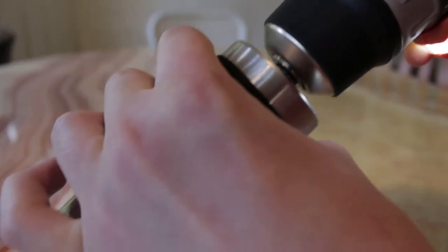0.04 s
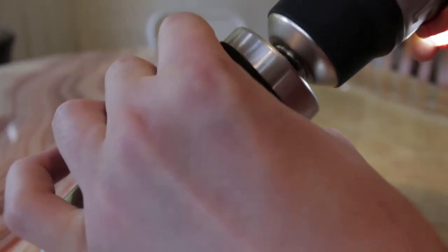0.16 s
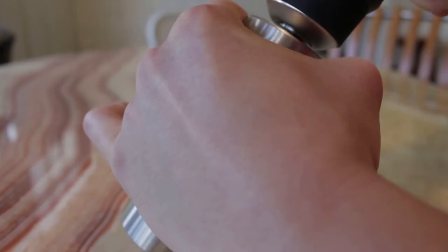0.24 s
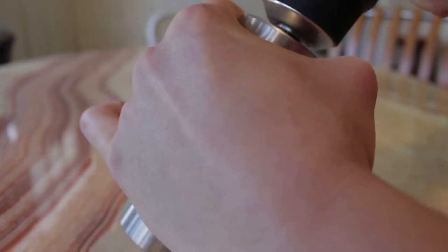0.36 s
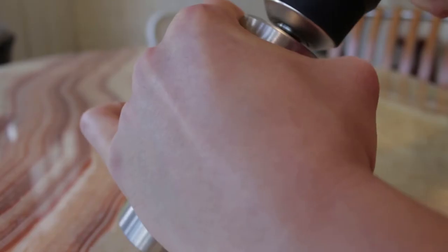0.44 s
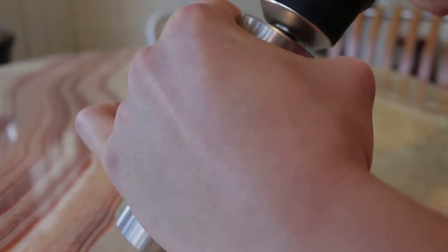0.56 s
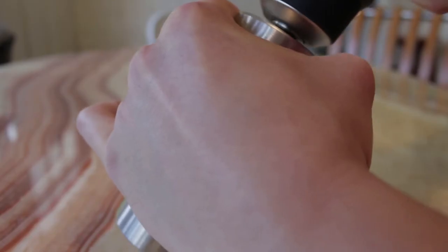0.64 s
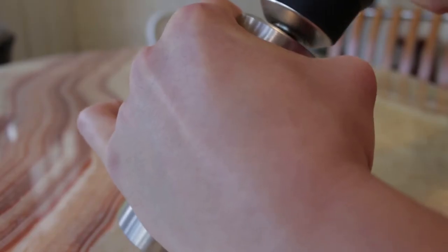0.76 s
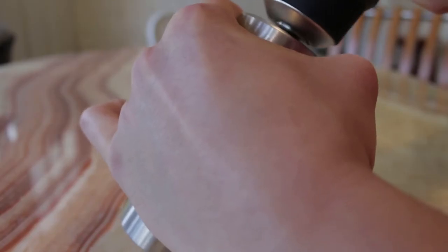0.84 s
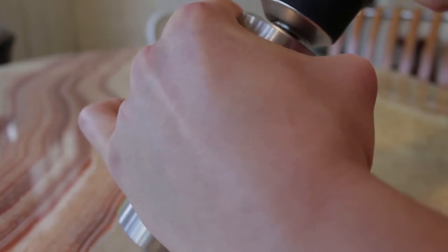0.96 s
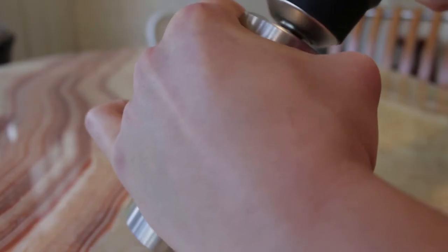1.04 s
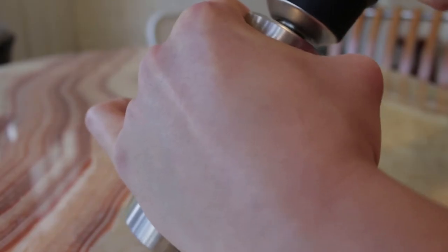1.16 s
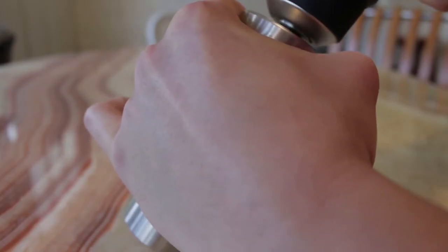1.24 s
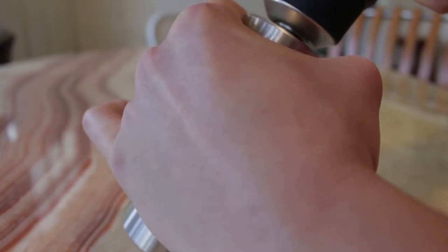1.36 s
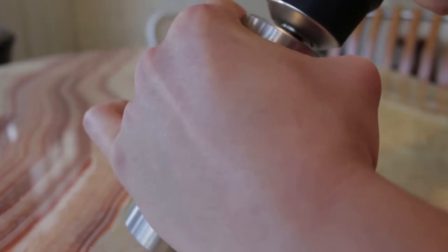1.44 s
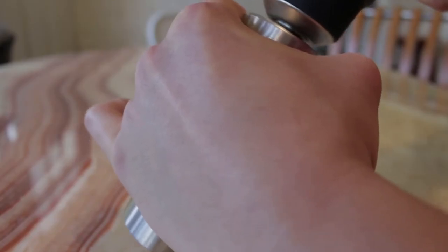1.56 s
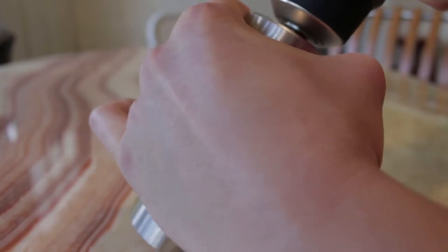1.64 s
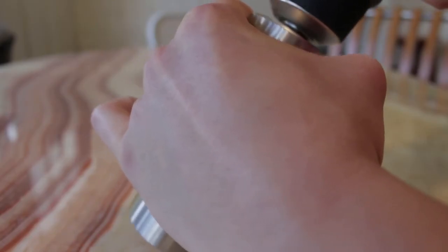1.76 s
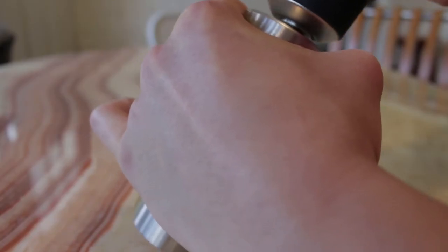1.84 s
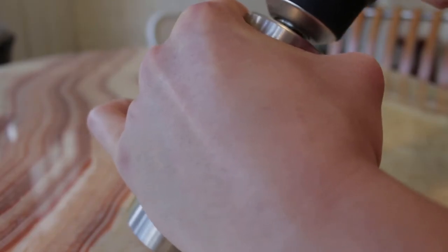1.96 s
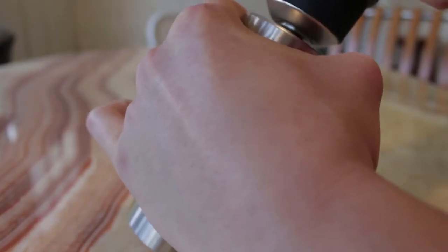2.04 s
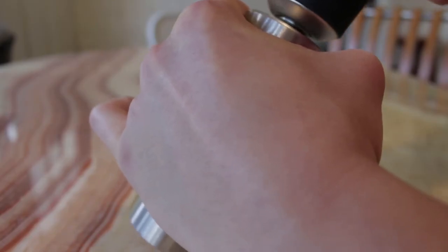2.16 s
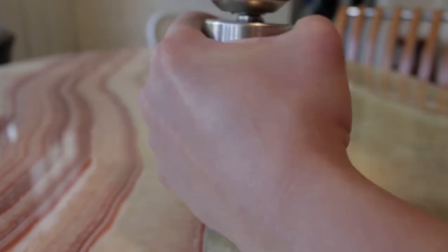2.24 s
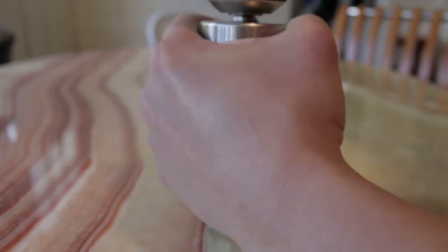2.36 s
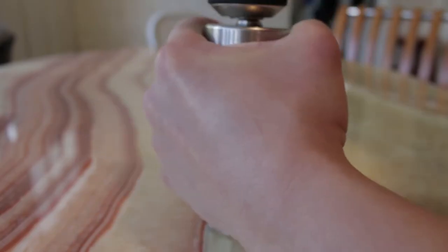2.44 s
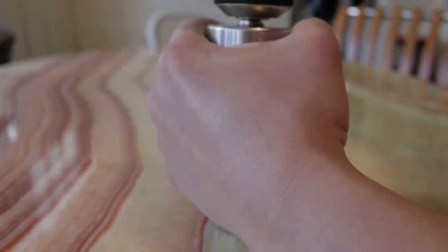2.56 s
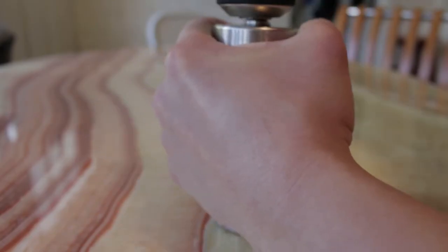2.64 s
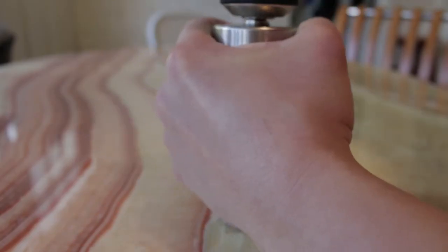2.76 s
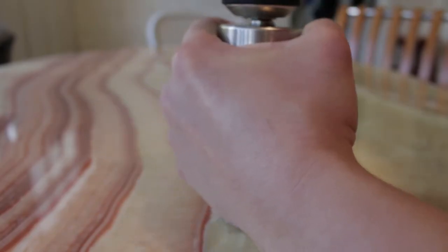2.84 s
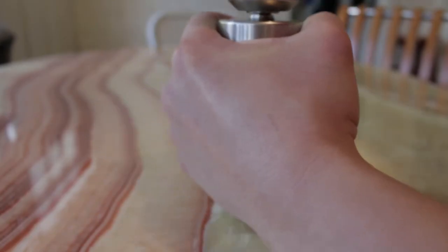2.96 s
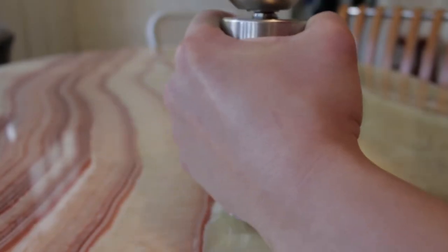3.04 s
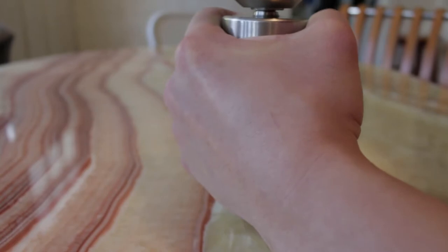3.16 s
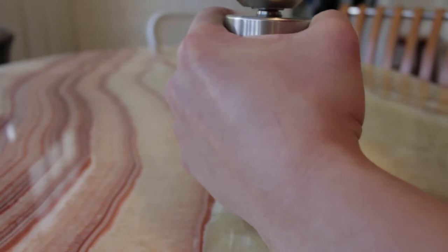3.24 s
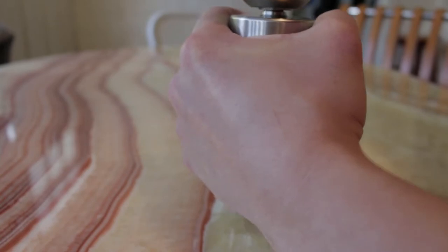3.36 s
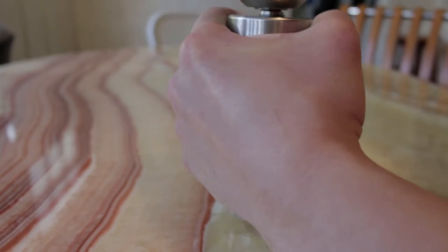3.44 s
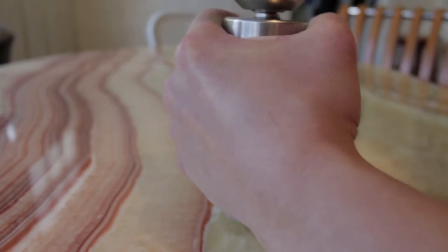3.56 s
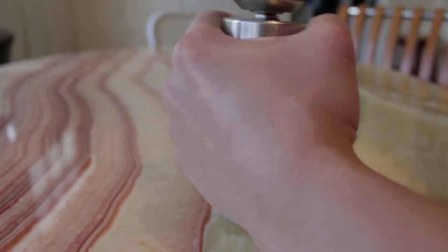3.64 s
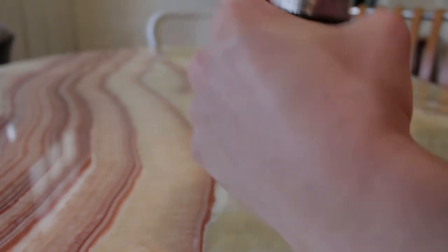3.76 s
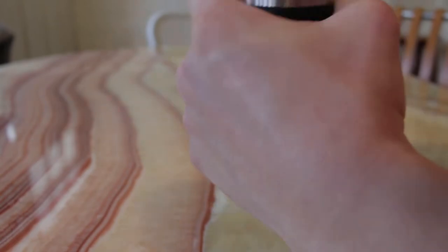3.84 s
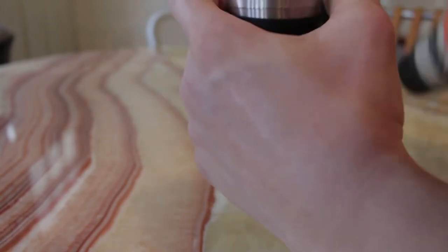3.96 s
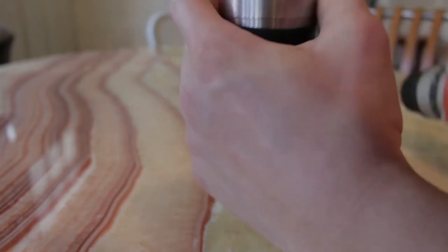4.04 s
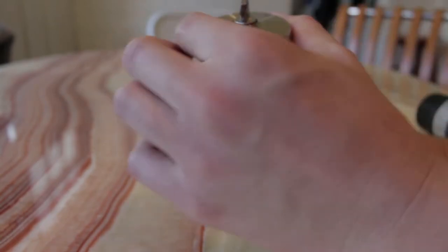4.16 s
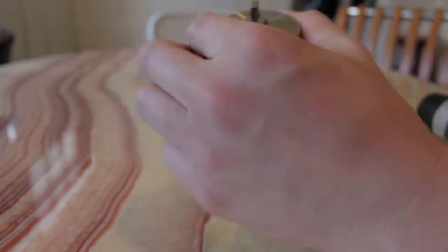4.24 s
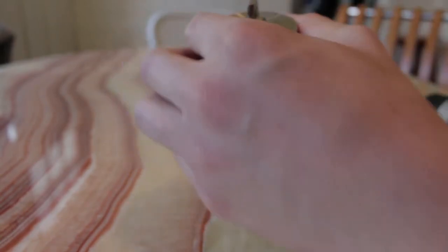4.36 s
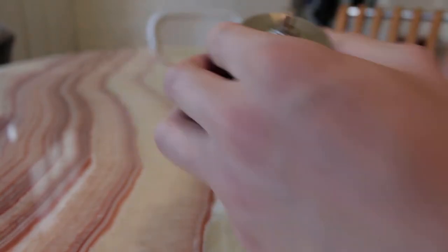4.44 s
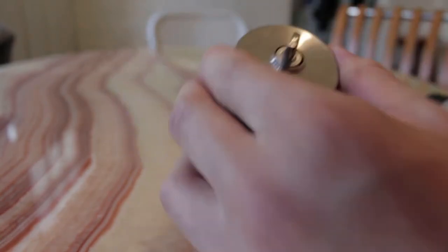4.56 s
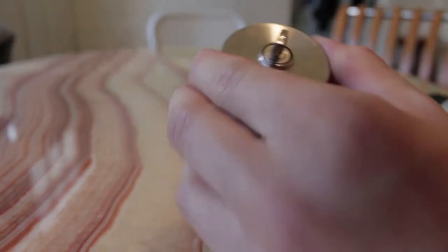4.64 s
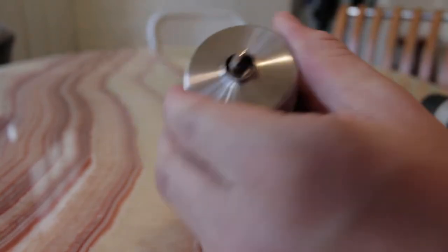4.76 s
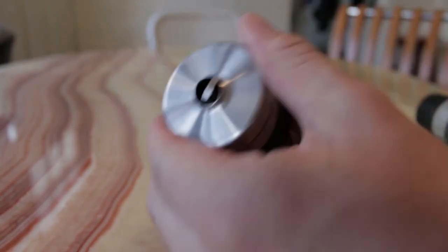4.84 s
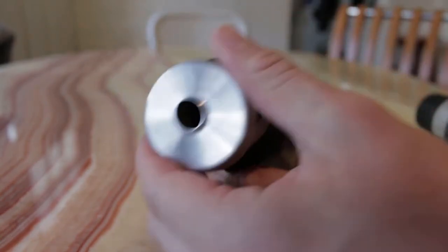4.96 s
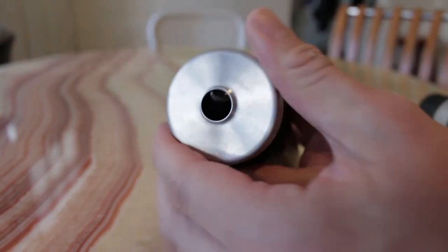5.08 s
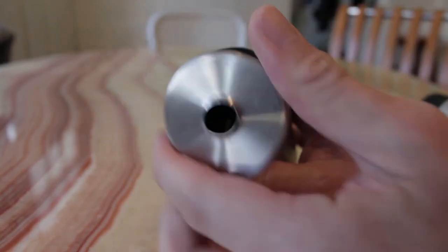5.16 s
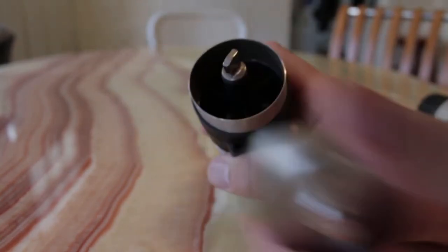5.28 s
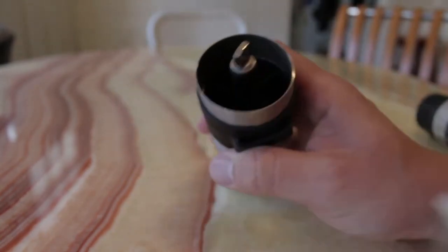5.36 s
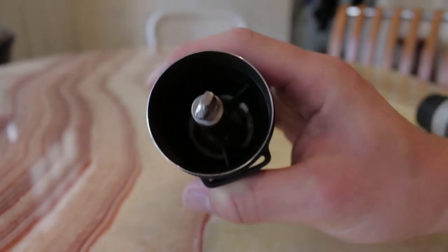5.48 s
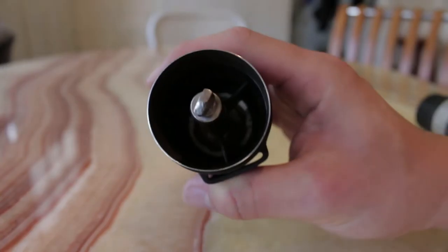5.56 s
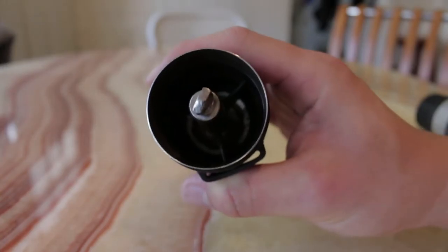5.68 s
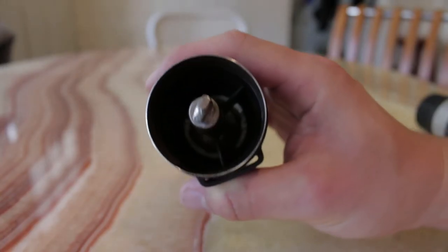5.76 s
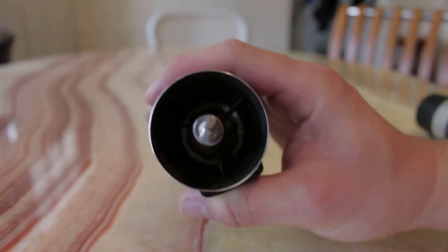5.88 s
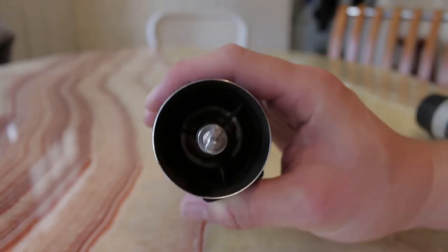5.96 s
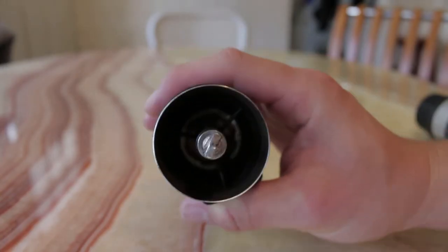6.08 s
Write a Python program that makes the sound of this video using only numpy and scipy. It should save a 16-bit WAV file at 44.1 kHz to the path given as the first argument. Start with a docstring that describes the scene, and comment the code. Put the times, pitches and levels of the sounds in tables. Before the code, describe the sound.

A cordless drill is already running at the start, humming and whining as it spins a steel hand coffee grinder. At about 0.2 seconds the burrs bite: beans crunch densely, with small squeals and chirps, and the gears warble under the uneven load. The grinding stays loud and steady, shifting slightly in tone at 2.2 seconds. From 2.4 to 2.9 seconds the grinder chatters softly on the table. The drill stops abruptly at 3.7 seconds. A lens motor whirrs faintly beside the microphone from about 4.1 to 5.4 seconds. The drill is put down with a knock at 4.4 seconds and a lighter plastic clatter at 4.6. Around 4.8 seconds the steel lid clinks and scrapes off over the hollow cup. A soft hand bump and rub follow at 5.2, leaving low room tone until 6 seconds. Everything is close, in stereo, in a small quiet room.

```python
"""A cordless drill spins a steel hand coffee grinder held over a table. The motor hums and whines, the
gears warble under the uneven load, beans crunch and squeal between the burrs, and the grinder briefly
chatters on the table top. The drill stops and is put down with a knock. A lens motor whirrs faintly by
the microphone, the steel lid clinks and scrapes off over the hollow cup, and the hand shifts its grip.
All of it is close, in stereo, in a small quiet room."""
import sys
import numpy as np
from scipy import signal
from scipy.fft import rfft, irfft
from scipy.io import wavfile

SR = 44100
rng = np.random.default_rng(int(sys.argv[2]) if len(sys.argv) > 2 else 0)


def unload_audio(sound):
    """Save the sound as a 16-bit wav file, at the path given as the first command line argument."""
    columns = np.transpose(np.atleast_2d(sound))
    # keep every value between -1 and 1, then stretch to whole-number steps
    steps = np.round(np.clip(columns, -1, 1) * 32767)
    wavfile.write(sys.argv[1], SR, steps.astype(np.int16))


N = 269444
T = np.arange(N) / SR
FREQ = np.maximum(np.fft.rfftfreq(2 * N, 1 / SR), 1)
# cues: the grinding changes abruptly twice, then the drill stops
FIRST_CHANGE_S, SECOND_CHANGE_S, STOP_S = .232, 2.23, 3.67

# motor shaft: t/s, rotation f/Hz, hum level/dB
MOTOR_RUN = [(0.0, 325.2, -29.5), (0.21, 329.3, -26.5), (0.24, 321.7, -34.5), (0.34, 325.2, -31),
             (0.64, 324.2, -32), (1.02, 321.9, -33.5), (1.12, 317, -43.5), (1.23, 324.3, -31),
             (1.57, 323.4, -32), (1.62, 319.4, -35.5), (1.92, 324.5, -31), (2.12, 321, -35),
             (2.25, 319.8, -32), (2.37, 323, -33), (2.6, 322.4, -37), (2.93, 321.9, -34),
             (3.05, 324.4, -32), (3.36, 318.6, -36), (3.65, 323, -33)]
# motor whine, keyed by multiple of the shaft rate: level/dB running light, biting, upright
WHINE_PARTIALS = {3: (-33.5, -39, -35), 4: (-40.5, -44.5, -45), 6: (-41.5, -43.5, -55),
                  9: (-49, -43.5, -36), 10.5: (-29.5, -33.5, -35.5), 11.5: (-46, -43, -45),
                  14: (-56, -45, -43), 16: (-44, -45, -43.5), 17: (-53, -60, -44), 18: (-58, -47, -43),
                  19: (-55, -42.5, -49), 21.5: (-45, -46, -44), 26: (-55, -52, -48), 30: (-48, -58, -50),
                  33: (-58, -52, -46.5), 36: (-52, -41, -51), 37: (-56, -56, -51)}
# force of the grinding: t/s, level/dB
GRIND_FORCE = [(0.0, -22), (0.62, -24), (1.3, -22.5), (2.15, -24), (2.24, -20.5), (3.64, -19.5)]
# EQ of the grinder running light, biting and upright: f/Hz, level/dB
LIGHT_EQ = [(150, -33.5), (470, -1.5), (720, -6), (1000, 4.5), (2450, -2), (3100, 3), (3500, 5), (4050, 1),
            (4500, -8), (5200, -6.5), (8000, -9), (12900, -10.5), (13800, -9), (15500, -15)]
BITING_EQ = [(150, -22.5), (380, -10), (480, -3.5), (650, -1), (1100, 2), (2300, 2), (2650, 2), (3050, 1.5),
             (3750, 6.5), (4400, -4), (6500, -1.5), (8500, -7.5), (15500, -12)]
UPRIGHT_EQ = [(150, -29.5), (380, -11), (600, -4), (720, -6.5), (1100, 1), (2350, 0), (2650, 1.5),
              (3050, -0.5), (3800, 1), (4300, -4.5), (5400, -2), (6900, -4), (7600, -7.5), (15500, -15)]
# stereo width of the grinding, side against mid: f/Hz, level/dB
GRIND_SIDE_EQ = [(300, -22), (800, -11), (1800, -6.5), (3000, -6), (6000, -4.5), (14000, -3)]
# still air of the room: f/Hz, level/dB
AIR_EQ = [(12, -55), (20, -27), (40, -12.5), (65, -6.5), (148, -16), (190, -9.5), (372, -9.5), (439, -19),
          (550, -13.5), (1720, -27.5), (15500, -43.5)]
# gear tone, higher and weaker where the burrs slip: t/s, f/Hz, relative level/dB
GEAR_TONE = [(0.25, 860, -33), (0.28, 847, -27.5), (0.34, 903, -30.5), (0.39, 898, -24), (0.52, 850, -28.5),
             (0.545, 895, -42), (0.57, 877, -26), (0.78, 865, -28.5), (1.03, 887, -29.5),
             (1.06, 845, -26.5), (1.12, 835, -29), (1.13, 873, -29), (1.27, 868.0, -24.5), (1.29, 900, -29),
             (1.33, 863, -26.5), (2.0, 874, -28.5), (2.03, 892, -40), (2.08, 873.4, -29), (2.24, 872, -24),
             (2.28, 898, -35), (2.34, 863, -25), (2.41, 895.5, -32.5), (2.45, 880, -19.5), (2.49, 880, -32),
             (2.56, 877, -23.5), (2.6, 868, -19), (2.62, 906, -38), (2.65, 889, -24), (2.81, 889, -30.5),
             (2.88, 850, -30), (2.92, 917, -31), (2.97, 867, -25), (3.12, 905, -30), (3.33, 879.5, -31),
             (3.38, 846, -29), (3.44, 894, -32), (3.49, 846, -28.5), (3.55, 896, -30.5), (3.62, 872, -25),
             (3.66, 860, -34)]
# a bean sticks and chirps: t/s
CHIRP_TIMES = [0.918, 1.157, 1.21, 1.353, 1.429, 1.691, 2.211, 2.259, 2.327, 2.433, 2.491, 2.549, 2.606,
               2.663, 2.777, 2.873, 3.392, 3.532, 3.593]
# soft taps of the grinder on the table: f/Hz, level/dB
TAP_EQ = [(150, -22), (220, -14.5), (290, 4), (420, -14), (600, -3), (1200, -24)]
# ring of the table top: f/Hz, level/dB, t60/s
TABLE_MODES = [(220, -11, 0.24), (280.8, 2.5, 0.28), (340.5, -6, 0.32), (460, 2.5, 0.058),
               (557, 4.5, 0.075), (664, -1, 0.12), (867, 2, 0.18), (937, 9.5, 0.061), (1020, -14, .15),
               (1446, 1, 0.1), (1760, 2, 0.12)]
# the lens hunts for focus: start t/s, end t/s, level/dB, fade/(dB/s), relative sheen level/dB
FOCUS_MOVES = [(4.067, 4.62, -41.5, 13, -18.5), (4.607, 5.171, -42.5, -0.5, -14.5),
               (5.219, 5.43, -40.5, -11, -16.5)]
# resonances of the lens barrel, and its high sheen: f/Hz, level/dB
BARREL_EQ = [(150, -5.5), (320, 3), (500, -1), (950, -1.5), (1450, -3), (1950, -10), (2500, -1),
             (3300, -12), (4000, -3.5), (5200, -11.5), (6500, -13.5), (15500, -24)]
SHEEN_EQ = [(3000, -30), (6000, 0), (7900, -1), (9200, 1), (14300, -3), (15500, -12)]
# whistle of the lens motor: t/s, f/Hz, level/dB
LENS_WHISTLE = [(4.07, 13300, -60), (4.11, 14000, -63), (4.158, 13540, -62), (4.206, 14060, -60),
                (4.3, 13250, -66)]
# the drill lands on the table: t/s, relative level/dB of thud, ring, clatter
LANDINGS = [(4.3641, 16.5, -24, -2), (4.624, -27, -51, 4)]
# its thud, and the clatter of its plastic case: f/Hz, level/dB
THUD_EQ = [(60, -46), (130, -31), (220, -8), (450, -2), (800, 2), (1500, -4.5), (2100, -8.5), (2600, -16),
           (3200, -29), (7000, -39), (15000, -35)]
CASE_EQ = [(200, -9), (700, -8), (1400, 2.5), (1900, -10.5), (2600, -15), (4000, -23), (8000, -19),
           (15000, -42)]
# steel lid: f/Hz, level/dB, t60/s, pitch drop at full lift/fraction (negative rises)
LID_MODES = [(1830, -16, 0.046, 0.0057), (3000, -2.5, 0.04, -0.022), (3210, -5, 0.033, -0.06),
             (3300, 0.5, 0.013, -.08), (4960, -14, 0.12, 0.0655), (5160, -12, 0.028, 0.073),
             (7520, -18, 0.15, .048), (7800, -14, 0.04, 0.05), (10670, -20, 0.11, 0.009),
             (11900, -12, 0.035, -0.005), (13700, -19, 0.04, 0)]
# the lid catches on the shaft: t/s, ring level/dB, lift/0-1, snap level/dB
LID_CATCHES = [(4.8169, -18, 0, -15), (4.8196, -19.5, 0.2, -16), (4.822, -19, 0, -8),
               (4.8857, -32, 0.95, -24), (4.8881, -24.5, 0.97, -7), (4.892, -31, 1, -24),
               (5.221, -52, .7, -32)]
# snap of each catch: f/Hz, level/dB
SNAP_EQ = [(150, -4), (450, 12), (1000, -8), (2600, -2), (3400, 15), (4400, 7), (6000, .5), (15000, -5)]
# scraping favours the lid's upper modes: f/Hz, level/dB
SCRAPE_EQ = [(3000, -9), (4900, 1), (8000, -6)]
# hollow cup of the grinder: f/Hz, level/dB, t60/s
CUP_MODES = [(370, -10, 0.11), (429, -2, 0.13), (520, -4.5, .05), (910, -10, 0.066), (1690, -14, 0.046)]
# the lid jolts the cup, which sounds lower once open: t/s, level/dB, pitch/ratio
CUP_JOLTS = [(4.82, -26, 1), (4.873, -29, .68)]
# soft bumps of the hand: t/s, level/dB, decay time/s
HAND_BUMPS = [(5.176, -33.5, 0.059), (5.352, -47, 0.19)]
# low bump of the hand, and fingers rubbing on steel: f/Hz, level/dB
BUMP_EQ = [(12, -39), (22, -13), (43, -3.5), (113, -16.5), (203, -11), (420, -18), (880, -90)]
RUB_EQ = [(300, 1), (1500, -3), (4000, -16), (14000, -24)]
# panning of the tilted grinder, the upright grinder and the lens: f/Hz, left minus right level/dB
TILTED_PAN = [(900, -0.5), (1800, -3), (2900, -2.5), (5700, -7.5), (8400, -5.5), (14000, -4.5)]
UPRIGHT_PAN = [(900, 0), (1800, -2.5), (5500, -3.5), (8200, -2), (11000, -5), (14000, -0.5)]
LENS_PAN = [(400, 1.5), (2200, -5), (8000, -4), (9300, -7.5), (14000, -7)]
# wall reflections, mid and side: f/Hz, level/dB
ROOM_MID_EQ = [(100, 4.5), (300, -18), (1200, -11), (3000, -4), (4700, -6), (6500, -22), (15000, -39)]
ROOM_SIDE_EQ = [(300, -14), (1000, -10.5), (3000, -4), (6000, -1), (15000, -19)]


def amp(db):
    """Decibels to gain."""
    return 10 ** (np.asarray(db) / 20)


def automation(rows):
    """The columns of a table as control curves over time."""
    times, *columns = np.transpose(rows)
    return [np.interp(T, times, column) for column in columns]


def unit(x):
    """Scale to rms 1."""
    return x / np.sqrt(np.mean(x ** 2))


def noise():
    """White noise."""
    return rng.standard_normal(N)


def wobble(rate):
    """Smooth random modulation of rms 1, with about rate new values a second."""
    knots = rng.standard_normal(int(N / SR * 1000))
    return unit(signal.resample(knots[:max(4, int(rate * N / SR))], N))


def after(s, fade=0.011):
    """A quick ramp from 0 to 1, centred on time s."""
    return np.clip((T - s) / fade + .5, 0, 1)


def envelope(start, end, db, fade_db_per_s=0, attack=0.0054, release=0.0093):
    """Attack, a level or sloping hold, release."""
    gate = after(start, attack) * (1 - after(end, release))
    return gate * amp(db - fade_db_per_s * np.clip(T - start, 0, end - start))


def gains(points):
    """EQ points as a gain for each frequency."""
    hz, db = np.transpose(points)
    return amp(np.interp(np.log(FREQ), np.log(hz), db))


def eq(x, points):
    """Minimum-phase EQ, so nothing rings ahead of a hit."""
    cepstrum = irfft(np.log(gains(points)))
    cepstrum[1:N] *= 2
    cepstrum[N + 1:] = 0
    return irfft(rfft(x, 2 * N) * np.exp(rfft(cepstrum)))[:N]


def convolve(x, response):
    """Play a sound through an impulse response."""
    return signal.fftconvolve(x, response)[:N]


def tail(t60):
    """A decaying noise burst of unit energy."""
    t = T[:SR // 2]
    burst = rng.standard_normal(len(t)) * 1000 ** (-t / t60)
    return burst / np.sqrt(np.sum(burst ** 2))


def ring(modes, pitch=1):
    """A struck body; each hit excites the modes a little differently."""
    t = T[:SR // 2]
    return sum(rng.choice([-1, 1]) * amp(db + rng.standard_normal())
               * np.sin(2 * np.pi * hz * pitch * t) * 1000 ** (-t / t60) for hz, db, t60 in modes)


def at(s, sound):
    """Place a one-shot on the timeline."""
    return np.concatenate([np.zeros(int(s * SR)), sound, np.zeros(N)])[:N]


def grains(rate, spread_db):
    """Random clicks, about rate a second; spread_db makes a few stand out."""
    clicks = (rng.random(N) < rate / SR) * noise()
    return unit(clicks * amp(spread_db * np.minimum(rng.exponential(size=N), 4)))


def phase(hz):
    """Running phase of a moving pitch."""
    return 2 * np.pi * np.cumsum(hz) / SR


def stages():
    """Crossfades for the grinder running light, biting and held upright."""
    loaded, upright = after(FIRST_CHANGE_S), after(SECOND_CHANGE_S)
    return np.array([1 - loaded, loaded - upright, upright])


def motor(shaft, hum_db, flutter_rad=0.021, flicker_db=1.9):
    """The unbalanced rotor hums; fan and commutator whine above it, changing with load and grip."""
    shaky, shares = shaft + flutter_rad * wobble(40.1), stages()
    whine = sum(amp(np.dot(db, shares) + flicker_db * wobble(21.92)) * np.sin(multiple * shaky)
                for multiple, db in WHINE_PARTIALS.items())
    # the hum skips half a cycle twice, with a soft tick
    skips = np.pi * (after(FIRST_CHANGE_S, fade=0.0026) + after(SECOND_CHANGE_S, fade=0.0015))
    return np.sqrt(2) * (amp(hum_db) * np.sin(shaft - skips) + whine)


def burrs(shaft, throb=0.13, flicker_db=0.43, stage_db=(-1.5, -0.5, -3)):
    """Beans crack and teeth rattle into the steel housing, a little harder once every motor turn."""
    force = amp(automation(GRIND_FORCE)[0] + flicker_db * wobble(70)) * (1 + throb * np.sin(shaft))
    voicings = list(zip((LIGHT_EQ, BITING_EQ, UPRIGHT_EQ), stage_db, stages()))

    def crunch():
        """Dense small fractures over a bed of rubbing grounds."""
        rattle = grains(rate=6000, spread_db=1.5) + 1.29 * noise()
        return force * sum(share * amp(db) * unit(eq(rattle, points)) for points, db, share in voicings)

    # the housing radiates from all sides, so each channel gets its own share
    mid, side = crunch(), eq(crunch(), GRIND_SIDE_EQ)
    return np.array([mid + side, mid - side])


def air(level_db=-55.65, rise_db=5.1):
    """A low bed of room tone that comes up as the drill stops."""
    return unit(eq(noise(), AIR_EQ)) * amp(level_db + rise_db * after(STOP_S))


def gears(burr_hz=9.25, first_swell_s=0.053, sag_hz_per_db=1, wander_hz=7.12, trim_db=-0.73):
    """Meshing teeth warble: each turn of the burr loads them, making the tone louder and lower."""
    hz, db = automation(GEAR_TONE)
    swell_db = 1.2 * np.cos(2 * np.pi * burr_hz * (T - first_swell_s))
    swell_db += 1.18 * wobble(24.88)  # the load varies from bean to bean
    pitch_hz = hz - sag_hz_per_db * swell_db + wander_hz * wobble(30)
    flicker_db, rough_rad = 2.5 * wobble(130), 0.42 * wobble(130)
    return np.sqrt(2) * amp(db + trim_db + swell_db + flicker_db) * np.sin(phase(pitch_hz) + rough_rad)


def bean_squeal(hz=2598, wander_hz=50, rasp_db=-35, flicker_db=3.5, chirp_db=-31.5, chirp_width_s=0.011):
    """Beans squeal between the burrs: a flickering rasp, and a short chirp where one sticks."""
    chirps = sum(np.exp(-((T - s) / chirp_width_s) ** 2) for s in CHIRP_TIMES)
    level = amp(rasp_db + flicker_db * wobble(70)) + amp(chirp_db) * chirps
    return np.sqrt(2) * level * np.sin(phase(hz + wander_hz * wobble(45)) + 0.78 * wobble(250))


def drill():
    """Motor and burrs run, joined after the first change by gears and squeal, until the trigger is let go."""
    hz, hum_db = automation(MOTOR_RUN)
    shaft = phase(hz)
    running = motor(shaft, hum_db) + after(FIRST_CHANGE_S) * (gears() + bean_squeal()) + burrs(shaft)
    return running * (1 - after(STOP_S, fade=0.015))


def chatter():
    """The shaking grinder taps fast and softly on the table and rings its low modes."""
    taps = eq(grains(rate=400, spread_db=2.5), TAP_EQ)
    rattle = amp(-3) * unit(convolve(taps, ring(TABLE_MODES))) + amp(-4) * unit(taps)
    return rattle * envelope(2.43, 2.92, db=-31, fade_db_per_s=8, attack=0.03, release=0.15)


def lens(waver_db=1.5, width_db=-4, lower_ratio=.915, rough_rad=.8):
    """A tiny friction motor rubs in its barrel with a high sheen, starting on a thin bending whistle."""
    body = sum(envelope(start, end, db, fade) for start, end, db, fade, _ in FOCUS_MOVES)
    bright = sum(envelope(start, end, db + sheen_db, fade)
                 for start, end, db, fade, sheen_db in FOCUS_MOVES)
    whirr = unit(eq(grains(rate=8300, spread_db=0), BARREL_EQ)) * body * amp(waver_db * wobble(40))
    # the sheen comes through the housing: part centred, part wide
    centre, left, right = (unit(eq(noise(), SHEEN_EQ)) for _ in range(3))
    sheen = bright * (centre + amp(width_db) * np.array([left, right]))
    hz, db = automation(LENS_WHISTLE)
    upper = np.sin(phase(hz) + rough_rad * wobble(400))
    lower = amp(-4) * np.sin(phase(lower_ratio * hz) + 2 * rough_rad * wobble(400))
    gate = after(LENS_WHISTLE[0][0]) - after(LENS_WHISTLE[-1][0])
    return sheen + whirr + np.sqrt(2) * amp(db) * (upper + lower) * gate


def knocks():
    """The drill lands: a blunt thud, the ringing table top and the clatter of the plastic case."""
    hits = sum(at(s, [amp(db)]) for s, db, _, _ in LANDINGS)
    rings = sum(at(s, amp(db) * ring(TABLE_MODES)) for s, _, db, _ in LANDINGS)
    clatter = sum(at(s, amp(db) * tail(t60=0.43)) for s, _, _, db in LANDINGS)
    boom = convolve(hits, tail(t60=0.45))
    thud = eq(amp(5) * hits + amp(2.5) * boom, THUD_EQ)
    return thud + rings + amp(13.5) * eq(clatter, CASE_EQ)


def lid_ring(lift, detune=0.0042, extra_ring=0.69):
    """The steel disc shifts its modes and rings longer as it comes free; no two hits are quite alike."""
    return ring([(hz * (1 - lift * drop + detune * rng.standard_normal()),
                  db, t60 * (1 + lift * extra_ring)) for hz, db, t60, drop in LID_MODES])


def lid(squeak_hz=4950):
    """The lid snaps and rings at each catch; between them it scrapes up the shaft and squeaks once."""
    rings = sum(at(s, amp(db) * lid_ring(lift)) for s, db, lift, _ in LID_CATCHES)
    snaps = sum(at(s, amp(db) * tail(t60=0.013)) for s, _, _, db in LID_CATCHES)
    friction = convolve(grains(rate=1400, spread_db=3), lid_ring(0))
    slide = envelope(4.835, 4.895, db=-39, fade_db_per_s=30, attack=0.036, release=.03)
    scrape = unit(eq(friction, SCRAPE_EQ)) * slide
    squeak = envelope(4.857, 4.868, db=-31) * np.sin(phase(squeak_hz + 60 * wobble(300)))
    return rings + scrape + squeak + eq(snaps, SNAP_EQ)


def cup():
    """Each jolt of the lid draws a short hollow knock from the cup."""
    return sum(at(s, amp(db) * ring(CUP_MODES, pitch)) for s, db, pitch in CUP_JOLTS)


def hands():
    """The grip shifts with low bumps, and skin rubs on the steel."""
    bumps = sum(amp(db) * after(s, fade=.03) * np.exp(-np.maximum(T - s, 0) / decay_s)
                for s, db, decay_s in HAND_BUMPS)
    skin = unit(eq(grains(rate=3000, spread_db=2), RUB_EQ))
    rub = skin * envelope(5.16, 5.28, db=-46, attack=.06, release=.06)
    return unit(eq(noise(), BUMP_EQ)) * bumps + rub


def pan(x, balance, lag_samples):
    """Two close microphone ports: the left hears the sound later and with softer treble."""
    lean = np.sqrt(gains(balance)) * np.exp(-1j * np.pi * FREQ * lag_samples / SR)
    return irfft(rfft(x, 2 * N) * np.array([lean, 1 / lean]))[:, :N]


def room(x, t60=0.82):
    """The walls answer with a reverb that is dull in the centre and wide in the treble."""
    mid = eq(convolve(x, tail(t60)), ROOM_MID_EQ)
    side = eq(convolve(x, tail(t60)), ROOM_SIDE_EQ)
    return np.array([mid + side, mid - side])


def scene():
    """The mix: close grinding, then lens and handling, over room tone and reverb."""
    grinding, upright = drill() + chatter(), after(SECOND_CHANGE_S)
    handling = knocks() + lid() + cup() + hands()
    direct = pan(grinding * (1 - upright) + handling, TILTED_PAN, lag_samples=2.04)
    direct += pan(grinding * upright, UPRIGHT_PAN, lag_samples=0.68)
    reverb_send = amp(-23.5) * grinding.mean(axis=0) + amp(-7.5) * handling
    return direct + air() + pan(lens(), LENS_PAN, lag_samples=3) + room(reverb_send)


def record(dry, top_hz=15850):
    """A steep low-pass takes off the very top."""
    return signal.sosfilt(signal.ellip(12, .1, 90, top_hz, fs=SR, output="sos"), dry)


dry = scene()
out = record(dry)
unload_audio(out)
```